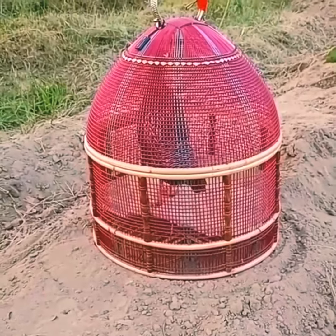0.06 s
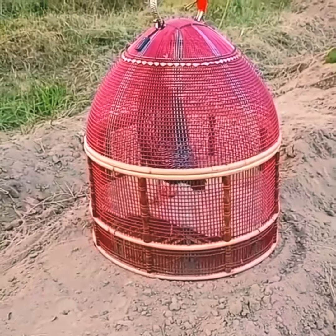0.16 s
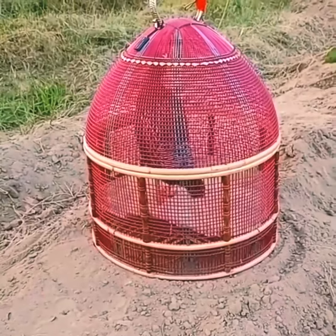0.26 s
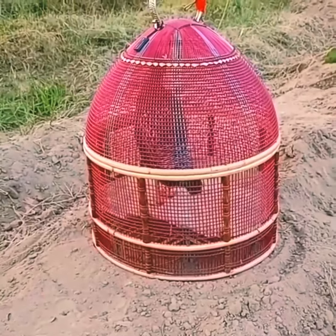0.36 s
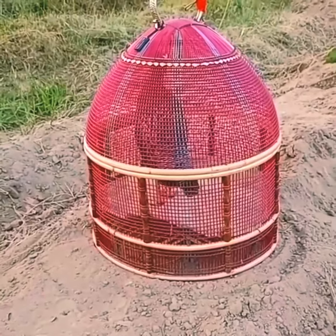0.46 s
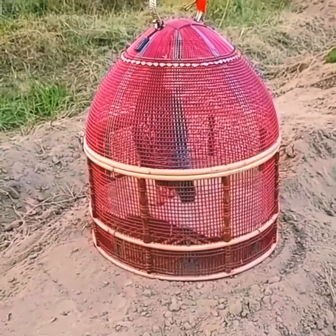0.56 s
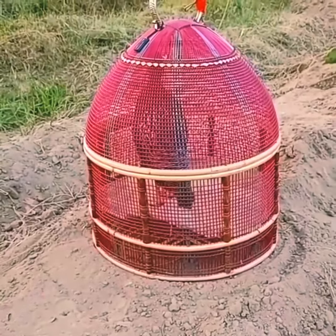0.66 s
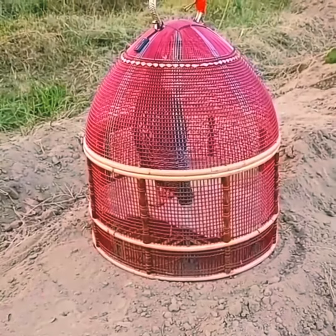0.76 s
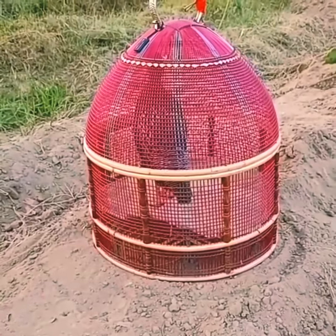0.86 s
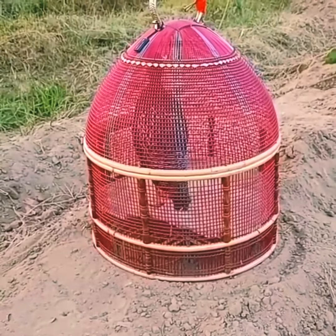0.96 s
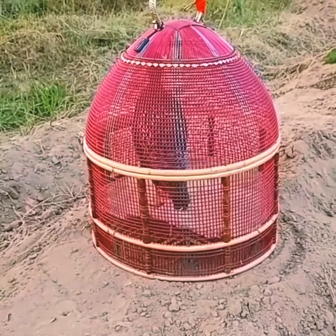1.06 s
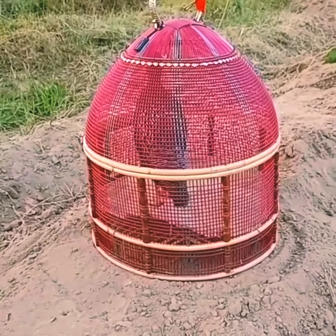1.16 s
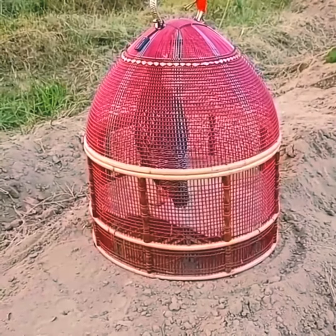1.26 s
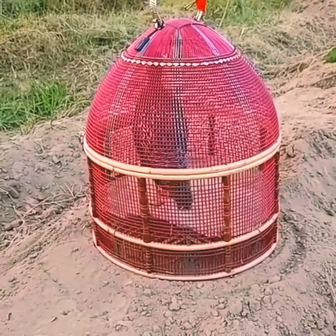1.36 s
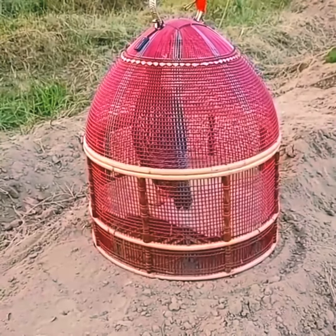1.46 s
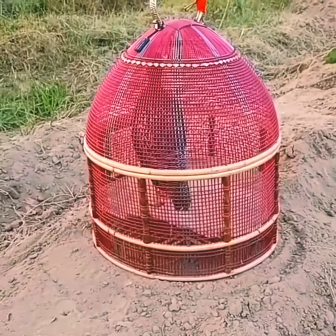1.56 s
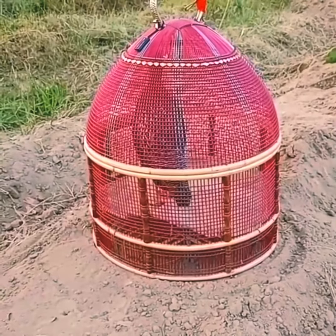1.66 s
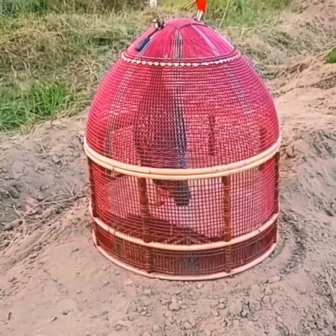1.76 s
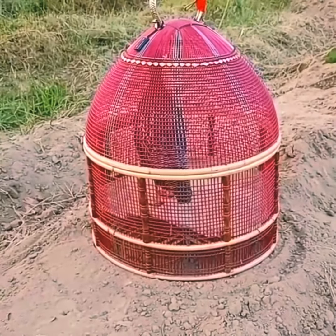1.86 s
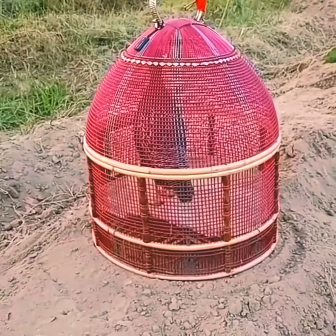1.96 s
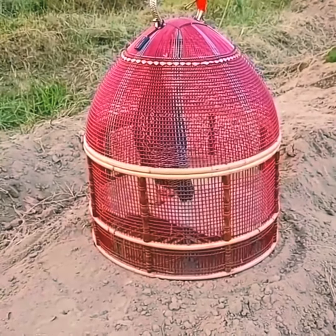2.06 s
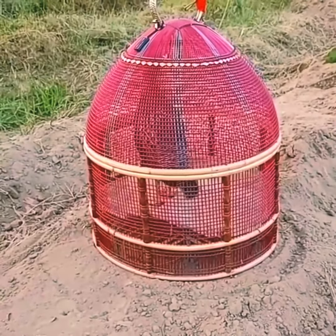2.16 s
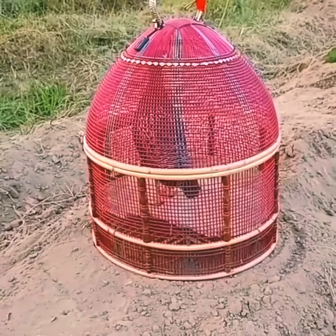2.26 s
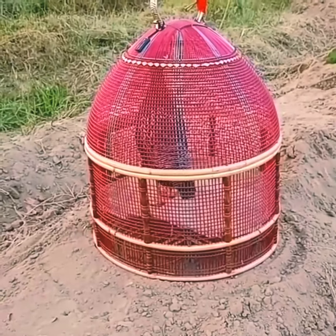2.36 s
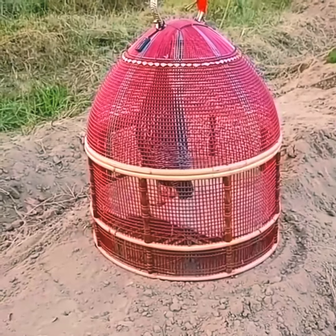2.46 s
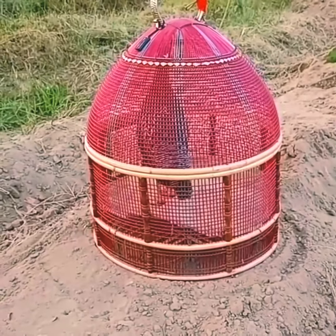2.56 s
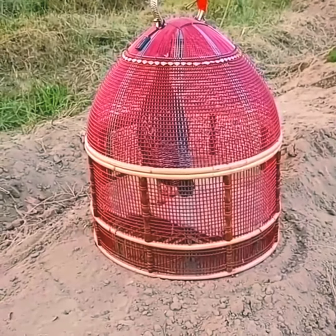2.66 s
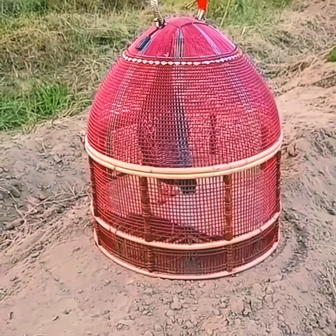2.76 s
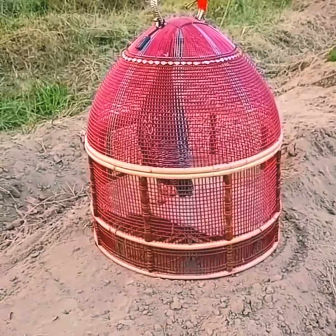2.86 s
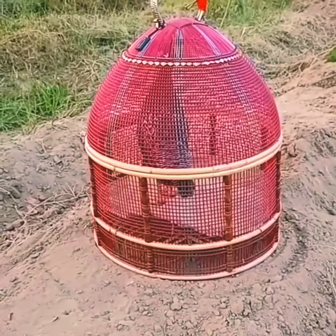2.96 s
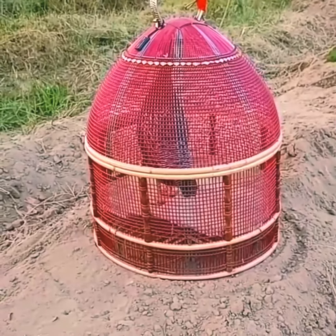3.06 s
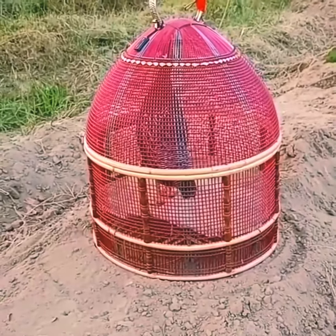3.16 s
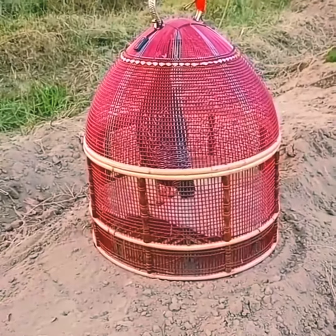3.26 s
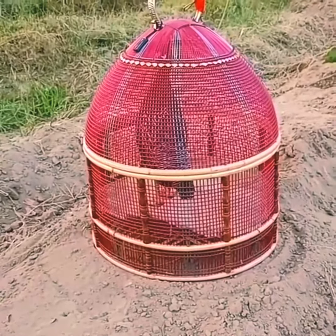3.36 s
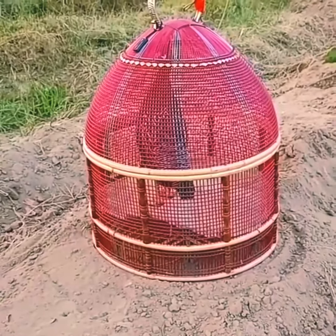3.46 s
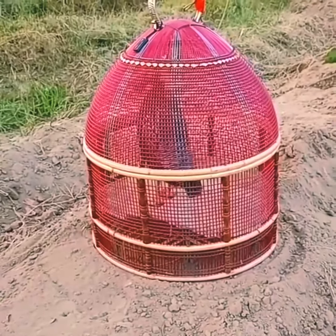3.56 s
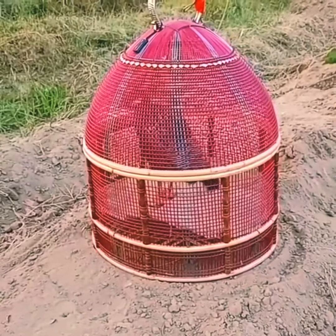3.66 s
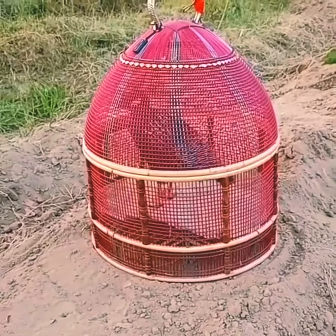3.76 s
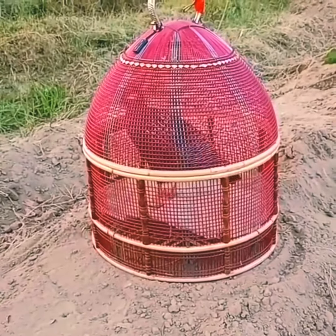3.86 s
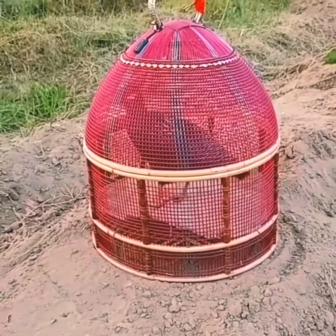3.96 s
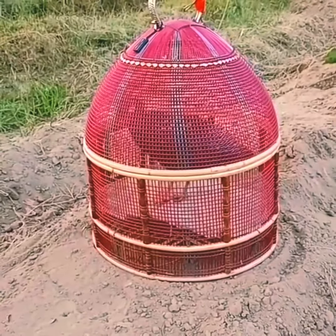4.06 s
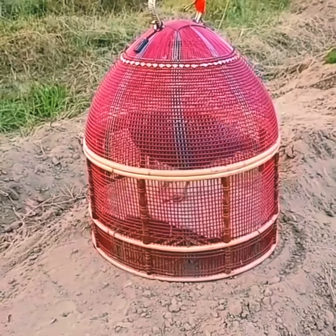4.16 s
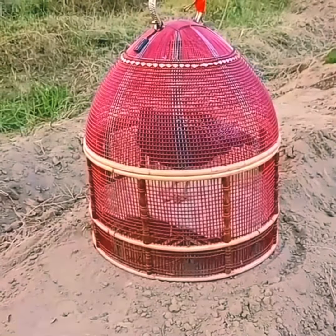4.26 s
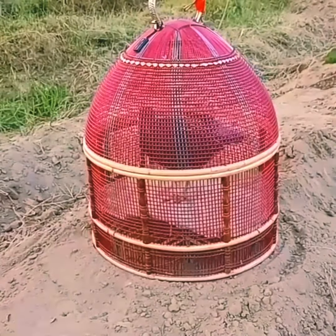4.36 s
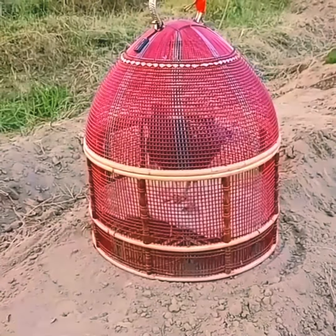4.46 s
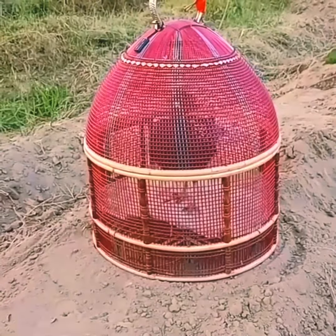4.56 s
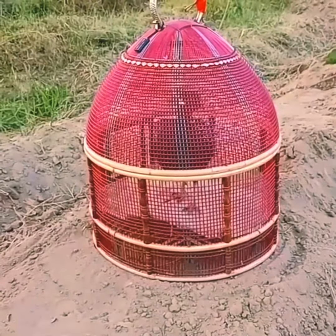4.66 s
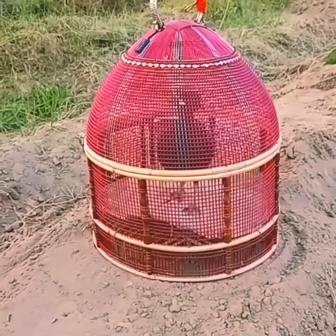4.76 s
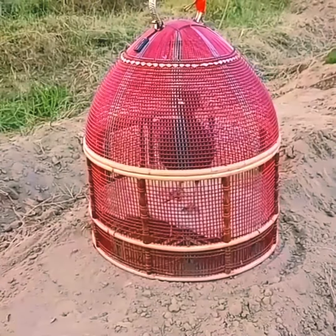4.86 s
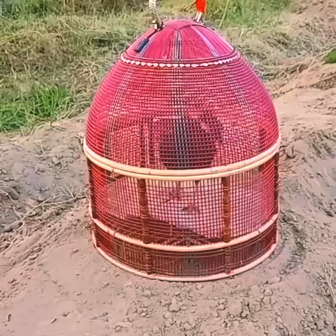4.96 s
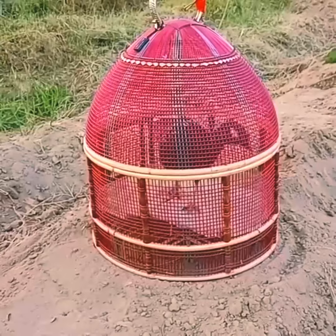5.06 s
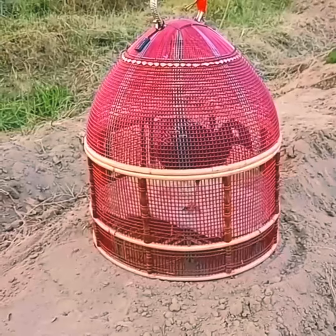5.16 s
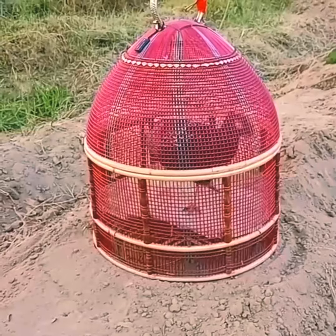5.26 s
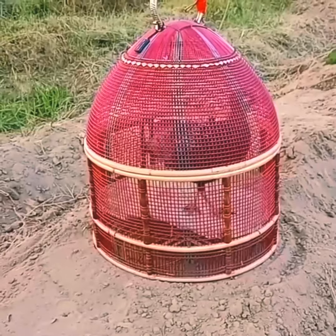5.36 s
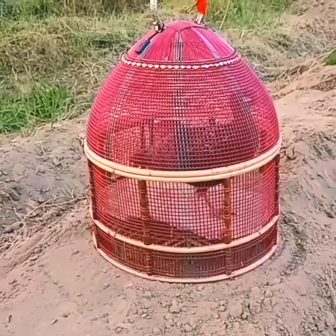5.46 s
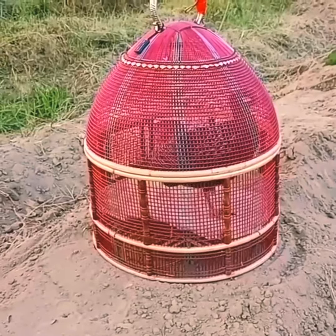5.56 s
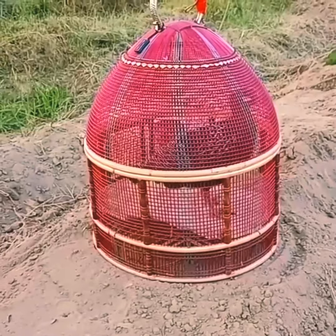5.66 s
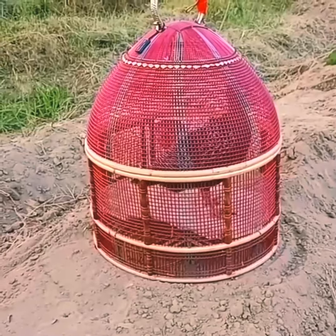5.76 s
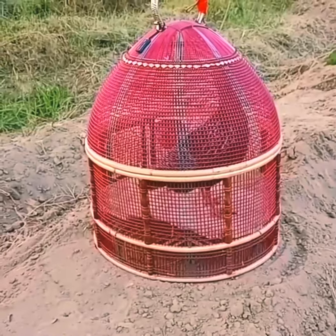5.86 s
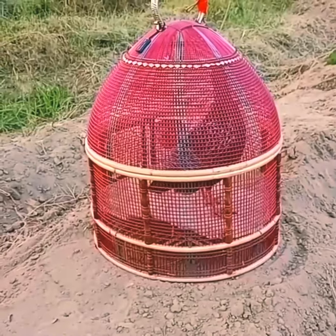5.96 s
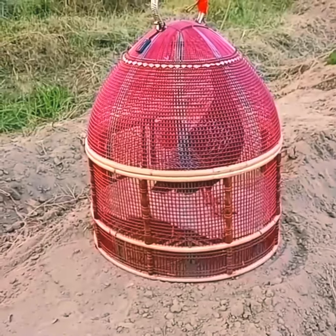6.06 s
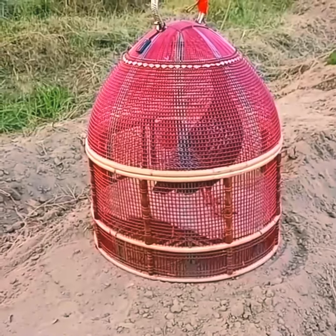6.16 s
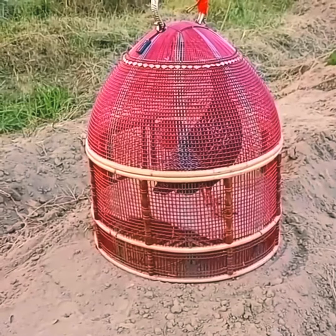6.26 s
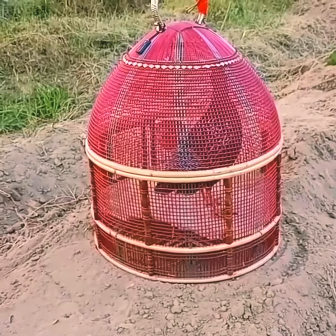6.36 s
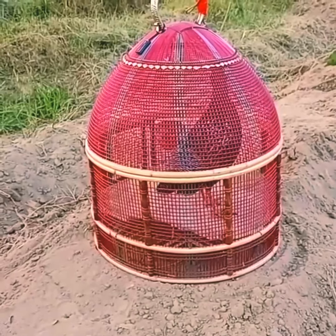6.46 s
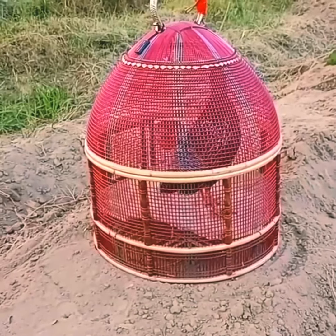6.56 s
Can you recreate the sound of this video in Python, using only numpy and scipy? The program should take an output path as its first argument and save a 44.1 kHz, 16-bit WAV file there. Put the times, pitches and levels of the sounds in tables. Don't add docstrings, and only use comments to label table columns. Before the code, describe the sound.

Small distant birds whistle over faint air hiss, then a near caged partridge clucks, squeaks and rasps four piercing notes, two spaced and two in quick succession. Bright scatter from the cage and open ground trails each note. The rest is quiet: faint twittering, a far dove, thin insect bands, low engine and wind rumble, and late on a far rival rasping steadily. Small microphone, open field.

```python
import sys
import numpy as np
from scipy import signal
from scipy.fft import rfft, irfft
from scipy.io import wavfile
from scipy.ndimage import uniform_filter1d, minimum_filter1d

SR = 44100
rng = np.random.default_rng(int(sys.argv[2]) if len(sys.argv) > 2 else 0)


def output_pcm(signal):
    pcm = np.clip(np.atleast_2d(signal).T, -1, 1) * 32767
    wavfile.write(sys.argv[1], SR, np.round(pcm).astype(np.int16))


def decibels_to_gain(level_db):
    exponent = np.asarray(level_db, float) / 20
    return 10 ** exponent


N = 291060
TIME = np.arange(N) / SR

# start_s, end_s, effort_db, sag_db, fade_s
NOTES = [
    (.684, 0.823, -5.5, 2, 0.031),
    (0.988, 1.168, -8.5, 0.3, 0.034),
    (1.383, 1.472, -7.5, -1, 0.026),
    (1.525, 1.706, -7.5, 4, 0.025),
]


def rms_one(x):
    return x / np.sqrt(np.mean(x ** 2) + 1e-20)


def in_time(rows):
    return np.interp(TIME, *np.transpose(rows))


def drift(rate_hz, size=N):
    settle = 9000
    r = np.exp(-2 * np.pi * rate_hz / SR)
    noise = rng.standard_normal(size + settle)
    return rms_one(signal.lfilter([1], [1, -2 * r, r * r], noise)[settle:])


def resonance(x, hz, width_hz):
    r = np.exp(-np.pi * width_hz / SR)
    poles = [1, -2 * r * np.cos(2 * np.pi * hz / SR), r * r]
    return signal.lfilter(np.array([1, 0, -1]) * (1 - r * r) / 2, poles, x)


def butterworth(x, order, hz, kind):
    return signal.sosfilt(signal.butter(order, hz, kind, fs=SR, output="sos"), x)


def coloured(points):
    hz, level_db = np.transpose(points)
    grid_hz = np.maximum(np.arange(N // 2 + 1) * SR / N, 1)
    gain = decibels_to_gain(np.interp(np.log(grid_hz), np.log(hz), level_db))
    return rms_one(irfft(rfft(rng.standard_normal(N)) * gain, N))


def span(start_s, end_s, roundness=.5):
    where = slice(round(start_s * SR), round(end_s * SR))
    u = np.linspace(0, 1, where.stop - where.start)[:N - where.start]
    return where, u, np.sin(np.pi * u) ** roundness


def tone(hz):
    return 2 * np.pi * np.cumsum(hz) / SR


def air():
    # hz, level_db_per_hz
    air_spectrum = [(15, -35.5), (25, -9.5), (85, -2), (202, -10.5), (296, -17), (584, -18.5),
                    (1250, -23.5), (6730, -27.5), (7710, -21.5), (8600, -41), (13600, -45.5), (15200, -34),
                    (16500, -44.5)]
    hz, s, cells = signal.stft(coloured(air_spectrum), SR, nperseg=512)
    patches = uniform_filter1d(rng.standard_normal(cells.shape), size=5, axis=0)
    patches = uniform_filter1d(patches, size=9, axis=1)
    mottled = cells * decibels_to_gain(2.7 * rms_one(patches))
    return decibels_to_gain(-73) * signal.istft(mottled, SR)[1][:N]


def rumble():
    # peak_s, length_s, level_db
    gusts = [(0.064, 0.41, -76), (0.317, 0.038, -50.5), (0.419, 0.1, -71), (.68, .2, -75),
             (0.928, .14, -74), (1.105, 0.034, -50.5), (1.26, 0.18, -66), (1.582, .04, -52),
             (1.8, .2, -75.5), (2.103, 0.19, -70), (2.641, 0.11, -66.5), (2.818, 0.18, -75.5),
             (3.051, 0.081, -68), (3.24, 0.21, -65.5), (3.52, .26, -71), (3.87, 0.41, -66.5),
             (4.321, .2, -66.5), (4.61, 0.17, -68.5), (4.94, .34, -66.5), (5.17, .1, -65), (5.3, .12, -68),
             (5.64, 0.19, -65), (5.839, .16, -67), (6.168, .36, -66), (6.451, .22, -76)]
    lull_db = -82
    low = resonance(resonance(rng.standard_normal(N), 76, 58), 76, 58)
    level = np.full(N, decibels_to_gain(lull_db))
    for peak_s, length_s, db in gusts:
        level += decibels_to_gain(db) * np.exp(-.5 * (4.0 * (TIME - peak_s) / length_s) ** 2)
    return level * decibels_to_gain(0.83 * drift(1.5)) * rms_one(low)


def insects():
    # start_s, end_s, level_db
    bouts = [(0, 0.197, -78), (0.452, .66, -77.5), (1.951, 2.6, -80.5), (2.78, 3.53, -79.5),
             (3.76, 4.32, -86), (4.449, 5.14, -79.5), (5.38, 6.05, -77), (6.299, 6.65, -84)]
    white = rng.standard_normal(N) * decibels_to_gain(2.5 * drift(40))
    level = np.full(N, decibels_to_gain(-93))
    bands = [resonance(resonance(white, hz, width_hz), hz, width_hz)
             for hz, width_hz in [(7520, 450), (7850, 380)]]
    for start_s, end_s, db in bouts:
        where, u, swell = span(start_s, end_s, 0.64)
        level[where] += decibels_to_gain(db) * swell
    return level * rms_one(sum(bands))


def dove():
    # start_s, end_s, pitch_hz, level_db
    coos = [(1.224, 1.414, 545, -79), (1.736, 1.86, 537, -76), (2.17, 2.32, 546, -76.5),
            (2.6, 2.656, 533.6, -83), (2.851, 3.018, 548, -74.5), (3.084, 3.161, 520, -81),
            (3.26, 3.512, 531, -79.5), (3.538, 3.611, 525, -83), (3.881, 3.967, 537.6, -75.5),
            (4.435, 4.639, 540, -74), (4.838, 4.919, 529, -76), (4.946, 5.1, 521, -83),
            (5.464, 5.627, 537.4, -77), (6.319, 6.475, 553, -77.5)]
    out, flicker, waver = np.zeros(N), decibels_to_gain(3.55 * drift(25)), 1 + .012 * drift(30)
    for start_s, end_s, hz, db in coos:
        where, u, swell = span(start_s, end_s, 0.61)
        out[where] += decibels_to_gain(db + 6) * swell * np.sin(tone(hz * (1.02 - .04 * u) * waver[where]))
    return out * flicker


def twitter():
    # time_s, chirps_per_s
    density = [(0, 38), (2, 34), (3.2, 23.4), (3.6, 30), (5.0, 25.3), (5.08, 92), (5.8, 70), (6.6, 34.6)]
    slots_per_s = 100
    out, waver = np.zeros(N), 1 + .02 * drift(200)
    for k, (chance, pitch, glide, length, size) in enumerate(rng.random((652, 5))):
        start_s = k / slots_per_s
        rate = np.interp(start_s, *np.transpose(density))
        if chance < rate / slots_per_s:
            where, u, swell = span(start_s, start_s + .012 + .02 * length, .8)
            hz = 2200 * 3.0 ** pitch * (1 + .16 * (glide - .5) * u) * waver[where]
            out[where] += decibels_to_gain(-88.5 + 0.12 * rate + 6.22 * size) * swell * np.sin(tone(hz))
    return out


def small_birds():
    # start_s, end_s, first_hz, last_hz, level_db
    rises = [(.048, .072, 2227, 2680, -65), (.081, .163, 3980, 5200, -51), (.149, .161, 2491, 2740, -54.5),
             (.186, .226, 6080, 7170, -63), (.524, .594, 3710, 5250, -53), (.538, .603, 3095, 4230, -57.5),
             (2.61, 2.66, 3972, 5190, -72.5), (2.84, 2.89, 3700, 5140, -68.5),
             (6.09, 6.215, 4840, 6180, -71.5)]
    # start_s, end_s, first_hz, last_hz, level_db
    falls = [(.083, .097, 2250, 1960, -67), (.157, .181, 5250, 4464, -72), (.171, .184, 2290, 1950, -61),
             (.603, .67, 4360, 1840, -48), (1.893, 1.98, 4900, 1894, -63),
             (2.052, 2.125, 2474, 2080, -57.5), (2.22, 2.247, 2256, 1905, -61.5),
             (2.328, 2.38, 5130, 2950, -60.5), (2.405, 2.452, 2565, 2380, -69),
             (2.452, 2.472, 2210, 2030, -66.5), (2.785, 2.96, 2690, 2504, -73),
             (3.34, 3.385, 6280, 3990, -76), (3.37, 3.42, 2760, 2606, -86), (3.545, 3.579, 6480, 4000, -82),
             (3.745, 3.785, 6690, 4010, -85.5), (4.452, 4.51, 3720, 2192, -79),
             (4.765, 4.86, 2928, 2596, -74), (5.072, 5.096, 3650, 3098, -64.5),
             (5.1, 5.198, 2800, 2600, -82.5), (5.304, 5.335, 3770, 3370, -69.5),
             (6.075, 6.135, 6600, 6030, -79.5)]
    # start_s, end_s, first_hz, last_hz, level_db
    flicks = [(1.854, 1.94, 2630, 2200, -61), (2.04, 2.07, 1950, 3000, -68), (3.08, 3.19, 2445, 1930, -79),
              (3.485, 3.518, 4160, 6000, -74.5), (3.694, 3.731, 4105, 5920, -78.5),
              (4.85, 4.94, 2606, 3000, -73.5), (5.855, 5.89, 6140, 5920, -79),
              (6.3, 6.363, 5340, 6266, -68.5), (6.455, 6.533, 5250, 6320, -74),
              (6.567, 6.62, 5660, 6490, -53)]
    # start_s, end_s, pitch_hz, level_db
    pips = [(0.1, 0.123, 2440, -59.5), (.19, 0.21, 2335, -66), (0.41, 0.506, 2225, -61.5),
            (2.134, 2.248, 2013, -75), (2.148, 2.252, 6580, -81), (2.16, 2.236, 3620, -80),
            (2.201, 2.283, 2550, -64), (2.365, 2.43, 6310, -81), (2.656, 2.71, 5310, -74),
            (2.74, 2.786, 2580, -79), (2.373, 2.399, 2870, -65), (2.42, 2.48, 3600, -86),
            (2.532, 2.56, 6150, -82.5), (2.66, 2.7, 3620, -85), (2.76, 2.82, 3990, -84),
            (2.91, 2.95, 3620, -83), (2.92, 2.949, 2200, -83.5), (5.36, 5.39, 6020, -83),
            (5.271, 5.3, 3000, -75), (2.78, 2.939, 5160, -78), (3.086, 3.14, 4840, -82.5),
            (3.165, 3.219, 4030, -78), (3.505, 3.556, 2886, -75.5), (4.66, 4.699, 2506, -85),
            (4.93, 5.018, 2416, -82.5), (5.33, 5.45, 2735, -78), (5.563, 5.639, 6110, -85.5),
            (5.59, 5.616, 2450, -82)]
    # start_s, beats_per_s, depth_0_1
    trills = [(2.041, 92, 0.6), (2.128, 89, .47), (2.2, 39.6, 1), (2.33, 73, 0.83), (2.405, 63, 1),
              (4.765, 91, 0.99), (4.85, 86.7, .9), (5.102, 60, .56), (5.33, 66, 0.63)]
    level_pips = [(s, end, hz, hz, db) for s, end, hz, db in pips]
    kinds = [(rises, .66), (falls, .55), (flicks, .12), (level_pips, .5)]
    songs = [(*song, halfway) for table, halfway in kinds for song in table]
    trilled = {}
    for start_s, beats_hz, depth in trills:
        nearest = np.argmin([abs(song[0] - start_s) for song in songs])
        trilled[nearest] = beats_hz, depth
    out, flicker, waver = np.zeros(N), decibels_to_gain(3 * drift(60)), 1 + .008 * drift(120)
    for k, (start_s, end_s, first_hz, last_hz, db, halfway) in enumerate(songs):
        where, u, swell = span(start_s, end_s, .4)
        glide = u + (4 * halfway - 2) * u * (1 - u)
        hz = first_hz + (last_hz - first_hz) * glide
        beats_hz, depth = trilled.get(k, (0, 0))
        beat = 1 - min(depth, 1) * np.cos(2 * np.pi * beats_hz * (end_s - start_s) * u)
        out[where] += decibels_to_gain(db + 6.5) * swell * beat * np.sin(tone(hz * waver[where]))
    return out * flicker


def hoarse(rows, roundness):
    lumps_db = 4
    out, white, lumps = np.zeros(N), rng.standard_normal(N), drift(90)
    for k, (start_s, end_s, hz, width_hz, db) in enumerate(rows):
        where, u, swell = span(start_s, end_s, roundness)
        narrow = white[where]
        for _ in range(3):
            narrow = resonance(narrow, hz, width_hz)
        level = decibels_to_gain(db + lumps_db * np.roll(lumps, 3000 * k)[where])
        out[where] += level * swell * rms_one(narrow)
    return out


def rival():
    rasps_db = [-74.5, -76, -66, -75.5, -72.5, -72, -70, -75.5, -83, -79]
    first_s, beat_s, length_s = 5.225, .145, .085
    starts_s = first_s + beat_s * np.arange(len(rasps_db))
    return [(s, s + length_s, 2900, 600, db) for s, db in zip(starts_s, rasps_db)]


def rasping_birds():
    # start_s, end_s, centre_hz, width_hz, level_db
    rasps = [(1.77, 1.88, 1947, 298, -76), (1.85, 1.89, 2540, 400, -56), (2.045, 2.08, 2498, 1194, -68),
             (2.13, 2.2, 2370, 401, -71), (2.1, 2.29, 3050, 400, -75), (2.36, 2.4, 5860, 400.3, -75),
             (5.17, 5.24, 5760, 705, -76), (5.24, 5.33, 5880, 506, -77), (5.63, 5.67, 3990, 501, -76),
             (5.73, 5.78, 3996, 501, -80.5), (5.73, 5.8, 5400, 599, -88), (5.18, 5.3, 4150, 495, -79),
             (5.42, 5.56, 2200, 500, -74.5), (5.62, 5.69, 5300, 1197, -79), (6.0, 6.08, 5690, 1200, -73.5),
             (6.2, 6.29, 6140, 800, -72.5), (6.415, 6.465, 5680, 1102, -55.5),
             (6.535, 6.59, 5240, 890, -60.5)]
    return hoarse([*rasps, *rival()], 0.83)


def short_bursts():
    # start_s, length_s, centre_hz, width_hz, level_db
    ticks = [(1.36, 0.04, 1600, 894, -53.5), (1.361, 0.04, 4800, 5000, -45),
             (4.037, 0.0081, 3500, 5000, -71), (5.426, .014, 3490, 4000, -66),
             (5.431, .01, 10500, 4000, -69.5), (5.436, 0.032, 4970, 3970, -74),
             (5.51, 0.028, 5810, 3000, -60.5), (5.515, 0.021, 10600, 4000, -74)]
    return hoarse([(s, s + length_s, *rest) for s, length_s, *rest in ticks], 0.75)


def throat(x):
    # centre_hz, width_hz, level_db
    formants = [(1500, 300, -11.5), (3050, 420, -6), (4276, 291.4, -3), (4950, 400, -5.5),
                (5747, 340, -1.5), (6714, 620, 0.83), (7220, 380, 2), (7620, 280, -2)]
    return sum((-1) ** k * decibels_to_gain(db) * resonance(x + 1e-18, hz, width_hz)
               for k, (hz, width_hz, db) in enumerate(formants))


def all_clucks():
    # start_s, length_s, pitch_hz, level_db, tilt_db_per_overtone
    steady = [
        (.333, .0097, 1520, -38, -13.5),
        (.657, 0.0066, 1470, -32, -4.5),
        (.966, .0072, 1060, -25.5, -1.5),
        (1.514, 0.0063, 1050, -36, -3.5),
    ]
    # start_s, length_s, pitch_hz, level_db, tilt_db_per_overtone
    falling = [
        (.273, .006, 2301, -30.5, 0.5),
        (.2765, .006, 2133, -24, -1.5),
        (.2805, 0.0031, 3246, -7, -14.5),
        (.283, 0.0087, 2410, -13, -4.5),
        (.289, 0.0066, 1720, -24, -17.5),
    ]
    # length_s, first_hz, last_hz, level_db, tilt_db_per_overtone
    glide_in = (0.0442, 1449.5, 2399, -30.5, -2.5)
    # length_s, first_hz, last_hz, level_db, tilt_db_per_overtone
    glide_out = (0.004, 1750, 1330, -36.5, -9.5)
    glide_out_lead_s = .015
    rows = []
    for table, pitch_share in [(steady, 1), (falling, .83)]:
        rows += [(s, length_s, hz, hz * pitch_share, *rest) for s, length_s, hz, *rest in table]
    rows += [(note[0], *glide_in) for note in NOTES]
    return rows + [(note[1] - glide_out_lead_s, *glide_out) for note in NOTES]


def clucks():
    out, steps = np.zeros(N), np.arange(1, 11)[:, None]
    shake, puff = drift(360), rng.standard_normal(N)
    for start_s, length_s, first_hz, last_hz, db, tilt_db in all_clucks():
        where, u, swell = span(start_s, start_s + length_s, 0.33)
        hz = (first_hz + (last_hz - first_hz) * u) * (1 + 0.066 * shake[where])
        stack = decibels_to_gain(tilt_db * (steps - 1)) * np.sin(steps * tone(hz) + steps ** 2)
        out[where] += decibels_to_gain(db) * swell * (stack.sum(axis=0) + decibels_to_gain(-17.0) * puff[where])
    return decibels_to_gain(10.0) * throat(out) + decibels_to_gain(-32) * out


def envelope(start_s, end_s, db, sag_db, fade_s):
    attack_s, attack_db, fade_db, release_s, release_db = .0045, -19.5, -3.5, .013, -22
    low_db = db - sag_db
    return [(start_s, db + attack_db), (start_s + attack_s, db), (end_s - fade_s, low_db),
            (end_s - release_s, low_db + fade_db), (end_s, low_db + release_db)]


def flip_rate():
    # time_s, flips_per_s, spread_share
    flips = [(.3, 250, .1), (.69, 280, .12), (.74, 278, .05), (.82, 248, .03), (.99, 252, .05),
             (1.03, 264, .025), (1.075, 240, .03), (1.1, 200, .2), (1.14, 250, .08), (1.17, 245, .08),
             (1.39, 246, .05), (1.43, 256, .03), (1.47, 226, .04), (1.53, 243, .06), (1.58, 229, .05),
             (1.6, 268, .1), (1.63, 258, .03), (1.66, 238, .03), (1.71, 195, .05)]
    s, rate_hz, spread = np.transpose(flips)
    return np.interp(TIME, s, rate_hz) * (1 + np.interp(TIME, s, spread) * drift(120))


def whistles():
    # start_s, end_s, first_hz, last_hz
    stuck_spans = [
        (.3105, 0.3128, 3000, 6720),
        (0.3139, .3312, 6770, 7516),
        (.3312, .3335, 6980, 3000),
        (.6872, 0.6916, 5846, 5982),
        (.692, .6955, 3050, 2957),
        (1.096, 1.099, 6630, 6635),
        (1.106, 1.109, 6730, 6990),
        (1.111, 1.114, 6590, 6650),
        (1.1189, 1.137, 6468, 6990),
        (1.583, 1.597, 6887, 7100),
    ]
    stuck, stuck_hz = np.zeros(N), np.zeros(N)
    for start_s, end_s, first_hz, last_hz in stuck_spans:
        where, u, swell = span(start_s, end_s)
        stuck[where] = 1
        stuck_hz[where] = last_hz - (last_hz - first_hz) * (1 - u) ** 2
    return stuck, stuck_hz


def locked(lift_hz, turns):
    cycle = (turns + 1 / 4).astype(int)
    gained = np.bincount(cycle, lift_hz) / SR + 1e-9
    return lift_hz * (np.maximum(np.round(gained), 1) / np.maximum(gained, 1))[cycle]


def levelled(x, effort, share):
    quick = uniform_filter1d(x ** 2, size=70) + 1e-9
    return x * (effort ** 2 / quick) ** (share / 2)


def harsh_notes():
    # time_s, effort_db
    squeak = [(0.3098, -39), (0.3114, -14.5), (0.3145, -3), (.3205, -26.5), (.3235, -13), (.329, -14),
              (0.3313, -24), (0.3318, -5.5), (.335, -12), (.338, -24), (.344, -48)]
    # low_hz, high_hz, held_low_db, held_octave_db, breath_db
    registers = [
        (3000, 6600, -27, -40.5, -22.5),
        (3050, 5750, -5.5, -12, -10.5),
        (3088, 5780, -9, -9, -9),
        (3115, 5720, -10, -9, -9.5),
        (3150, 5720, -15.5, -8.5, -8),
    ]
    # treble_db, chest_db, lean_to_low
    beak = [
        (4.5, -29.5, 0.085),
        (3, -33.5, 0.25),
        (-1, -27, 0.14),
        (-0.5, -25, .1),
        (-2.5, -22, .1),
    ]
    # hz, level_db_per_hz
    breath_spectrum = [(530, -90.5), (900, -56), (1490, -30.5), (2330, -30.5), (2890, -2), (3070, -6),
                       (3770, -14), (4200, -7.5), (5160, -20.5), (5820, -7), (8250, -21), (13200, -46),
                       (16000, -36.5)]
    climb, slow_sway, fast_wobble = .055, .011, .011
    overshoot_hz, edge_lean = 378.4, .3
    pulse_db = .4

    voice, rest, effort, treble, pulse = np.zeros((5, N))
    sway, wobble, shake = drift(39.994), drift(550), drift(600)
    breath = coloured(breath_spectrum)
    chest = rms_one(resonance(resonance(breath, 2350, 590), 2350, 590))
    flips_hz = flip_rate()
    stuck, stuck_hz = whistles()
    free = 1 - uniform_filter1d(stuck, size=40)
    calls = [squeak, *(envelope(*note) for note in NOTES)]
    for rows, register, (treble_db, chest_db, lean) in zip(calls, registers, beak):
        low_hz, high_hz, held_db, held_octave_db, breath_db = register
        where, u, swell = span(rows[0][0], rows[-1][0], .05)
        loose = free[where]
        effort[where] = decibels_to_gain(in_time(rows)[where]) * swell

        beat = tone(flips_hz[where])
        swing = np.sin(beat)
        up = .5 + .5 * np.tanh(2.5 * (swing - lean - edge_lean * (2 * u - 1) ** 4))
        low_hz = low_hz * (1 + climb * (u - .5) + slow_sway * sway[where])
        lift_hz = (high_hz - low_hz) * up + overshoot_hz * np.maximum(swing, 0) ** 8
        hz = low_hz + locked(lift_hz, beat / (2 * np.pi)) + fast_wobble * high_hz * wobble[where]
        hz = np.where(stuck[where] > 0, stuck_hz[where], hz)
        phase = tone(uniform_filter1d(hz, size=24))
        voice[where] = decibels_to_gain(1.5 * shake[where] * loose) * np.sin(phase)

        twin = tone(low_hz)
        held = decibels_to_gain(held_db) * (1 - .5 * up) * np.sin(twin)
        held += decibels_to_gain(held_octave_db) * (.45 + 0.38 * up) * np.sin(2 * twin - beat)
        octave_level = decibels_to_gain(-40.0 + 2 * treble_db) * stuck[where] + decibels_to_gain(-20) * loose * (1 - up) ** 2
        octave = octave_level * np.sin(2 * phase)
        hiss = decibels_to_gain(breath_db) * (loose + 0.11) * breath[where]
        rest[where] = loose * held + hiss + octave + decibels_to_gain(chest_db) * loose * chest[where]
        pulse[where] = decibels_to_gain(pulse_db * swing * loose)
        treble[where] = decibels_to_gain(treble_db) - 1

    even = levelled(decibels_to_gain(8) * throat(effort * voice), effort, share=.7)
    voiced = butterworth(even, 6, 2550, "high")
    both = (voiced + effort * rest) * np.where(pulse > 0, pulse, 1)
    return both + treble * butterworth(both, 1, 11000, "high")


def cage(x):
    t60_s, level_db, treble_db = 0.14, -43.5, 17
    t = np.arange(round(.25 * SR)) / SR
    bright = decibels_to_gain(treble_db) * butterworth(x, 4, 8200, "high")
    x = x - 0.34 * resonance(x, 3050, 700) + bright
    return signal.fftconvolve(x, rng.standard_normal(len(t)) * decibels_to_gain(level_db - 60 * t / t60_s))[:N]


def field(x):
    # delay_s, level_db
    echoes = [(.002, -23.5), (.03, -36.5), (.07, -42.5), (0.129, -42), (.2, -57), (.3, -49), (.38, -66),
              (.55, -77.5)]
    delay_s, level_db = np.transpose(echoes)
    first, last = round(delay_s[0] * SR), round(delay_s[-1] * SR)
    t = np.arange(first, last) / SR
    scatter = rng.standard_normal(len(t)) * decibels_to_gain(np.interp(t, delay_s, level_db) - 31.0)
    scatter = butterworth(scatter, 2, [2600, 9000], "band")
    return signal.fftconvolve(x, np.r_[np.zeros(first), scatter])[:N]


def scene():
    far = small_birds() + twitter() + rasping_birds()
    partridge = butterworth(harsh_notes(), 4, 1250, "high") + clucks()
    scatter = cage(partridge + decibels_to_gain(11.0) * far) + field(partridge + decibels_to_gain(14.5) * far)
    background = air() + rumble() + insects() + dove() + far
    mono = background + short_bursts() + scatter + partridge
    return np.array([mono, mono])


def limited(x, top):
    need = minimum_filter1d(np.minimum(1, top / (np.abs(x) + 1e-9)), size=121, axis=-1)
    return x * uniform_filter1d(need, size=61, axis=-1)


def band_limit(x):
    return signal.sosfilt(signal.butter(12, 16800, fs=SR, output="sos"), x)


def record(dry):
    bent = dry + decibels_to_gain(1.5) * resonance(dry, 15024, 1500) + decibels_to_gain(-42.5) * dry ** 2
    bent = butterworth(bent, 2, 40, "high")
    top_cut = signal.ellip(8, .5, 45, 15900, fs=SR, output="sos")
    mix = limited(signal.sosfilt(top_cut, bent), top=0.84)
    return band_limit(mix)


dry = scene()
out = record(dry)
output_pcm(out)
```